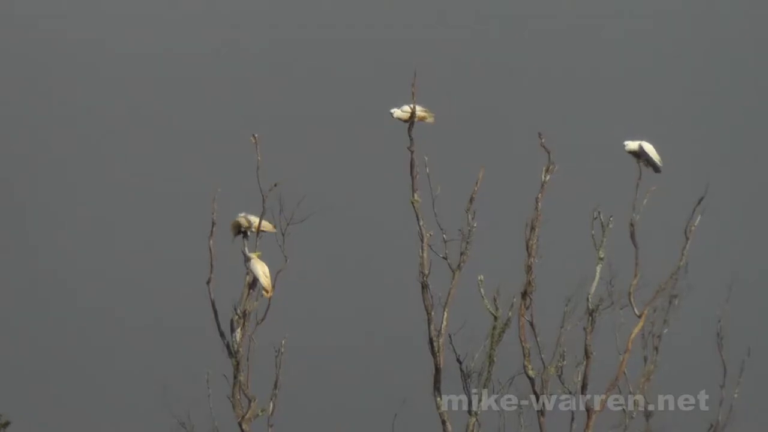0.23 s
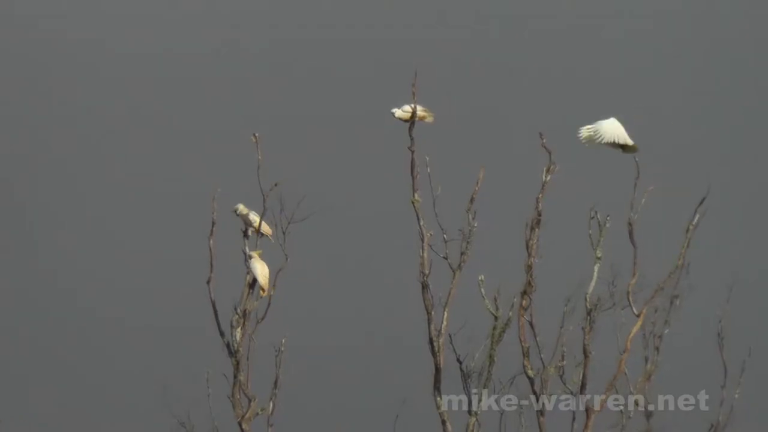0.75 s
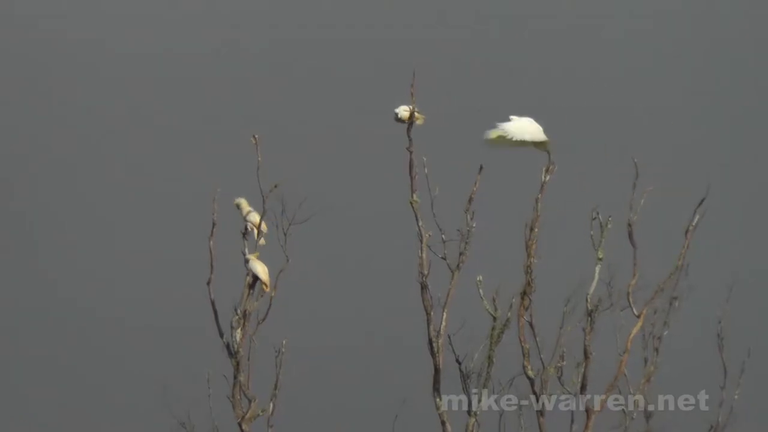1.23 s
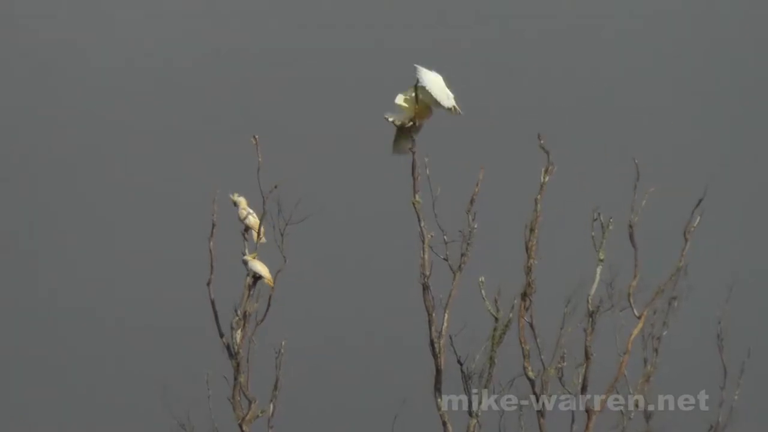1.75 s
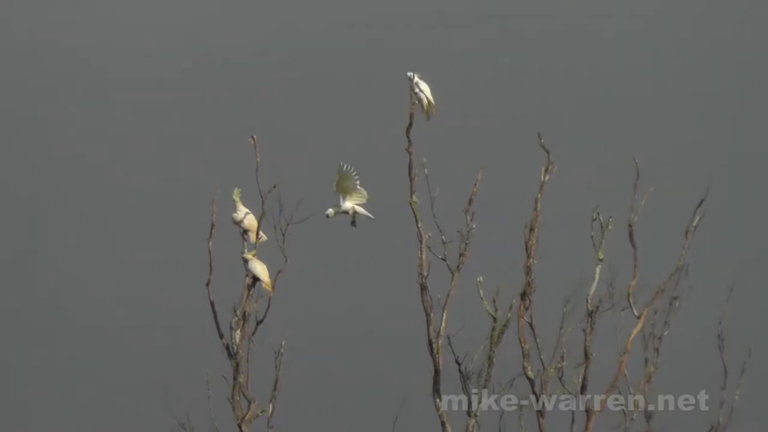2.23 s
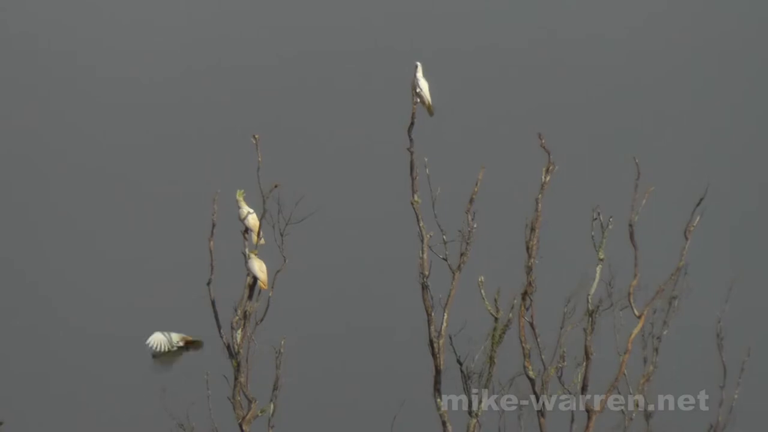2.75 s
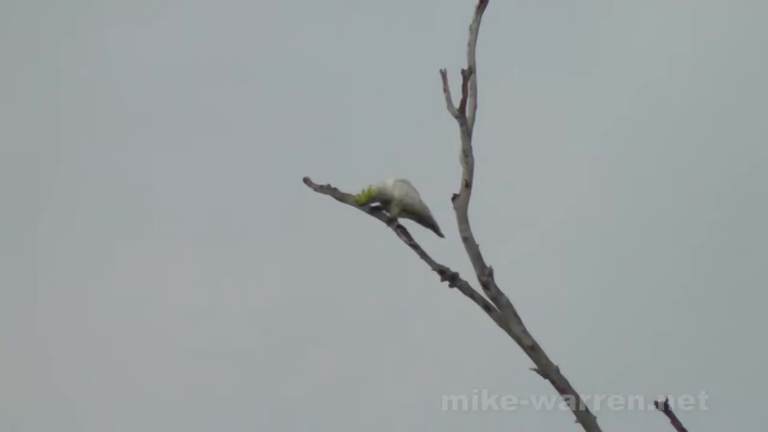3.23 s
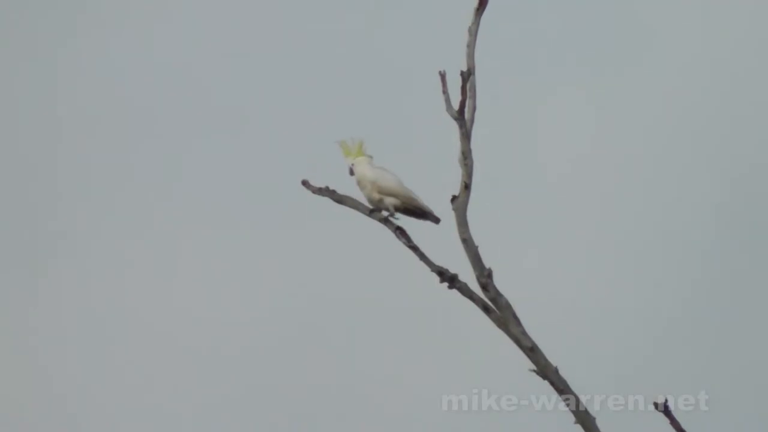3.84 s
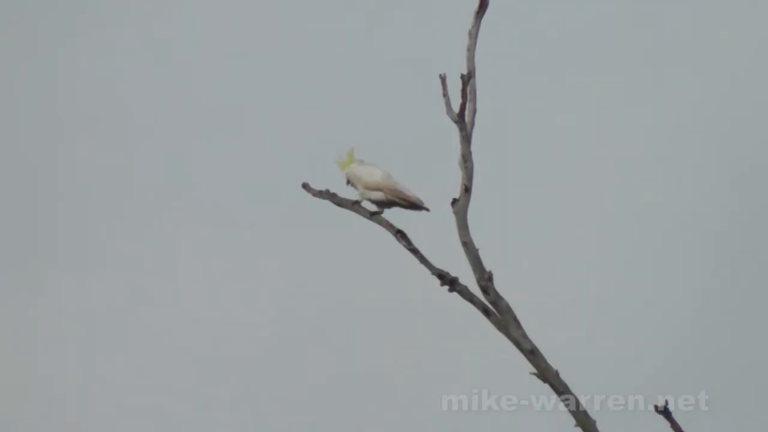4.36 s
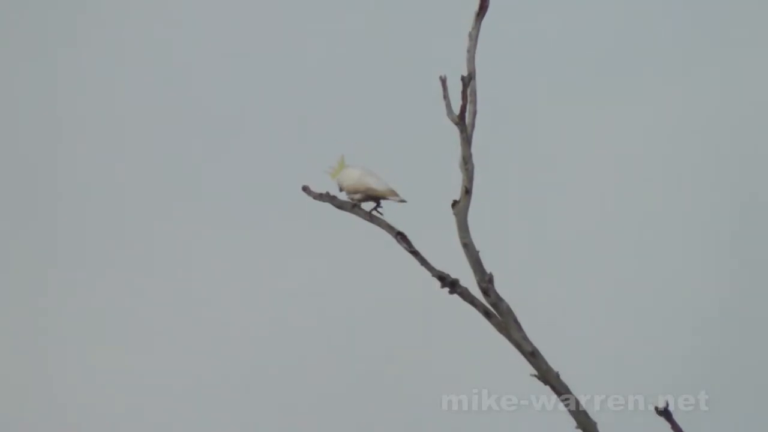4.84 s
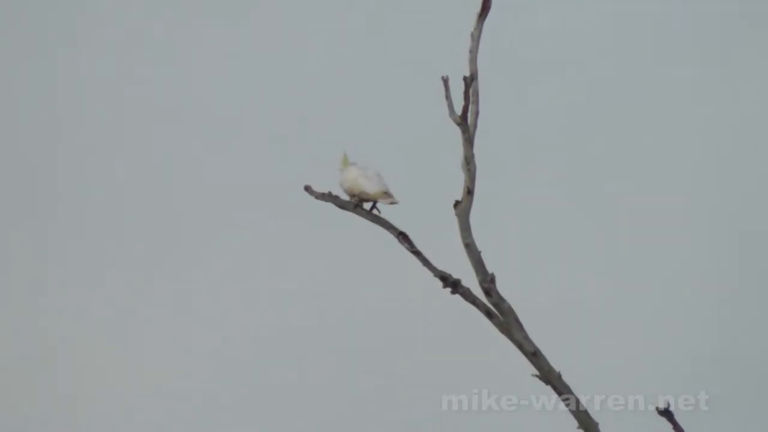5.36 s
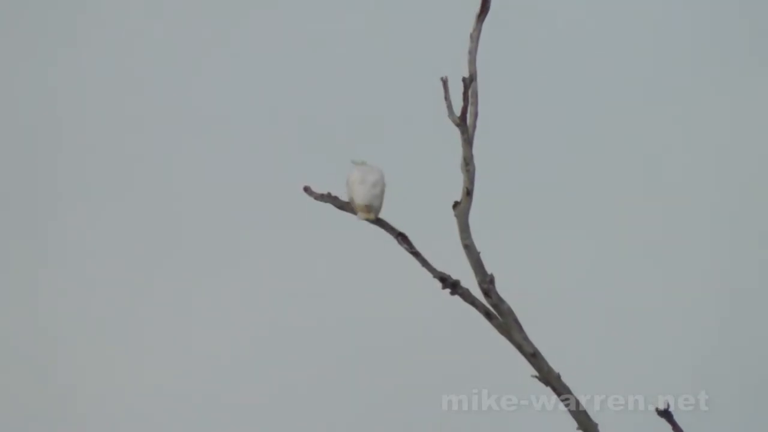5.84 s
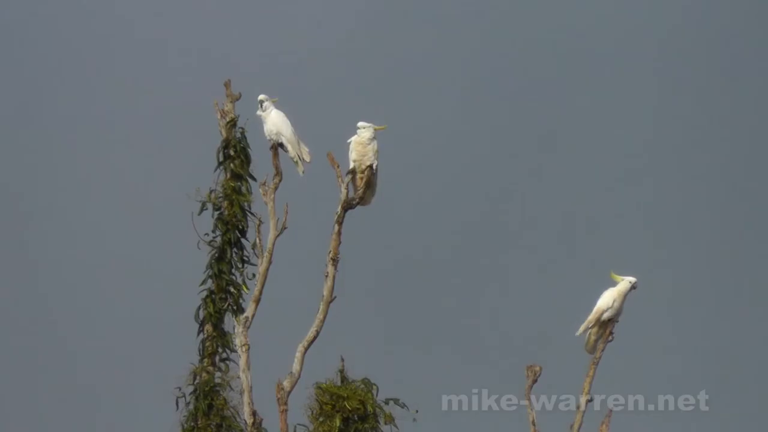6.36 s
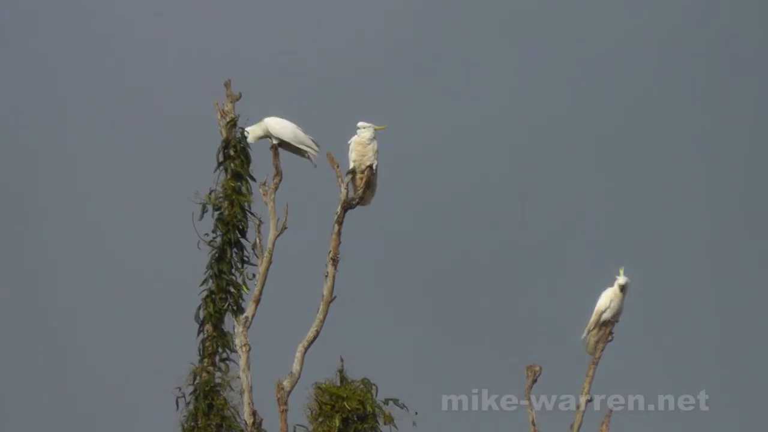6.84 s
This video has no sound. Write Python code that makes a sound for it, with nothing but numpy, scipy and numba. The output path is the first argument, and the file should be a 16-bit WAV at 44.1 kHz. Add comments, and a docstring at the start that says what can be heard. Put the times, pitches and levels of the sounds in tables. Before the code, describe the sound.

Three back-to-back raucous cockatoo screeches, then raspy croaks around a fourth, give way to popping frogs, small bird whistles and a distant noisy flock.

```python
"""Cockatoos by a river

Cockatoos screech from dead trees beside a river: four long harsh screams, and a lower rasp from a second bird.
Each voice is a syrinx source shaped by throat resonances; a scream's tone is shaken into chaos, calms and breaks.
Frogs pop as pairs of brief damped modes, crickets trill in pulsed chirps, small birds whistle and chip in glides.
Far cries are single shaking partials; the far flock, the insect haze, the wash and a soft bump are coloured noise.
The trees return a short diffuse echo of the near birds and the trills."""
import sys
import numpy as np
from scipy import signal
from scipy.fft import rfft, irfft, next_fast_len
from scipy.io import wavfile
from scipy.ndimage import uniform_filter1d
from numba import njit

SR = 44100
rng = np.random.default_rng(int(sys.argv[2]) if len(sys.argv) > 2 else 0)


def transcribe(signal):
    """Save signal, clipped to [-1, 1], as a 16-bit WAV file at the path in sys.argv[1]."""
    frames = np.atleast_2d(signal).T
    limited = np.clip(frames, -1, 1)
    pcm = np.round(limited * 32767).astype(np.int16)
    wavfile.write(sys.argv[1], SR, pcm)


N = 313110
T = np.arange(N) / SR  # time [s]

# spread of the throat and windpipe resonances, as a share of their frequency
THROAT_WANDER = 0.025

# spectral envelope of the throat: (frequency [Hz], gain [dB])
THROAT_SPECTRUM = [(60, -72), (350, -15.5), (780, -7.5), (1120, -1), (1550, 4.5), (2100, 2.5), (3100, 0),
                   (3900, -6), (4900, -9), (6600, -11), (7700, -19.5), (8400, -21.5), (10600, -33),
                   (11700, -45), (12700, -44), (15000, -65)]
# rattle of each scream in turn: (beat rate [1/s], depth [1], level of the snaps in full chaos [dB])
SCREAM_RATTLES = [(164.9, 0.53, -1), (205.7, 0.35, -8), (189, 0.24, -5), (160.2, 0.26, -16)]
# beak resonance, which shifts as the beak opens and closes: (time [s], centre [Hz], gain [dB])
BEAK_RESONANCE = [(.62, 4260, -12), (.78, 4800, 6), (.92, 4730, 0), (1.06, 4880, 2), (1.13, 4750, -15),
                  (1.25, 3430, 3), (1.65, 3430, -10), (1.85, 4820, -3.5), (2, 4900, 0), (2.05, 6640, 12),
                  (2.15, 6500, -3), (2.28, 6810, -21), (3.2, 5804, 0), (3.85, 5950, -24)]
THROAT_RATIO = 2.047  # the main throat resonance sits by the second partial
WINDPIPE_HZ, WINDPIPE_DB = 3340, -11.5  # a narrow resonance above the main one of the throat
ROUGH_PITCH_HZ = 23.8  # full chaos is this much higher than a pure tone
BREAK_DROP_HZ = 131.14  # the pitch drops by this much as a scream breaks
BREAK_THROAT_DB = -8  # the throat resonance weakens at the break
SHUDDER_DB = 1.1  # spread of the effort in full chaos


def screams(throat_db=-1.0, throat_width_hz=420.0, beak_width_hz=240.0, windpipe_width_hz=220.0):
    """Source-filter principle: a rattling syrinx excites the resonances of throat, windpipe and beak."""
    loud, treble_db, hiss_db, pitch, breaking = scream_controls()
    rough = roughness()
    surge_db, rise_hz = surges()
    beak_hz, beak_db = curves(BEAK_RESONANCE)

    pitch = pitch - ROUGH_PITCH_HZ * (1 - rough)
    throat_hz = (THROAT_RATIO * pitch + rise_hz) * (1 + THROAT_WANDER * walk(35))
    windpipe_hz = WINDPIPE_HZ * (1 + THROAT_WANDER * walk(20))

    starts = [row[0] for row in SCREAM_EVENTS]
    current = np.maximum(np.searchsorted(starts, T) - 1, 0)
    beat_hz, depth, snap_db = np.array(SCREAM_RATTLES)[current].T
    cycles = beats(beat_hz, jitter=0.15)
    flow = 1 + np.sqrt(rough) * (rattle(cycles, depth) - 1)

    source = colour(syrinx(pitch - BREAK_DROP_HZ * breaking, rough) * flow, THROAT_SPECTRUM)
    ring_db = throat_db + BREAK_THROAT_DB * breaking
    throat_ring = undb(ring_db) * resonance(source, throat_hz, throat_width_hz)
    windpipe_ring = undb(WINDPIPE_DB) * resonance(source, windpipe_hz, windpipe_width_hz)
    beak_ring = undb(beak_db) * resonance(source, beak_hz, beak_width_hz)
    voice = steady(source + throat_ring + windpipe_ring + beak_ring)
    voice = voice + undb(snap_db) * rough * (1 - breaking) * snaps(cycles, throat_hz)

    # body and treble are levelled separately, so that each follows its own control
    body = below(voice, 3300)
    hiss = voice - below(voice, 8000)
    treble = voice - body + (undb(hiss_db) - 1) * hiss
    shudder = undb(SHUDDER_DB * rough * walk(60))
    return loud * shudder * (undb(surge_db) * steady(body) + undb(treble_db) * steady(treble))


# partials of the syrinx tone: (multiple of the pitch [1], relative level [dB])
SYRINX_PARTIALS = [(1, 1), (2, 2.5), (3, -12), (4, -4.5), (5, -6.5), (7, -5.5)]


def syrinx(pitch, rough, thirds_db=2.0, air_db=6):
    """Nonlinear oscillation: chaos shakes the pitch amid rushing air; in calm it locks into a cycle of three."""
    shake = 0.115 * rough * walk(900) + 0.006 * walk(90)
    phase = 2 * np.pi * np.cumsum(pitch * (1 + shake)) / SR
    tone = unit(sum(undb(db) * np.sin(k * phase) for k, db in SYRINX_PARTIALS))
    # period tripling puts lines at every third of the pitch
    thirds = unit(sum(np.sin(k * phase / 3 + rng.uniform(0, 2 * np.pi)) for k in range(1, 8) if k % 3))
    air = noise() * (1 + 0.5 * np.cos(phase)) * (0.28 + 1.15 * rough)
    return tone + undb(thirds_db) * (1 - rough) ** 3 * thirds + undb(air_db) * air


# screams: (start [s], end [s], attack [s], opening level of the body [dB], closing level [dB],
#   treble relative to these [dB], added treble at the break [dB], gain of the hiss above 8 kHz within
#   the treble [dB], opening pitch in full chaos [Hz], pitch sag [Hz/s])
SCREAM_EVENTS = [(0.535, 1.122, 0.18, -31.5, -37, 1.5, 3, -1, 1314, 169.5),
                 (1.092, 1.664, 0.58, -26.5, -34.5, -4, 0, 0, 1288, 99),
                 (1.645, 2.295, 0.28, -32, -32, -1.5, 0.5, 3.5, 1277, 160),
                 (3.18, 3.835, 0.2, -35, -34, -0.5, 2.5, -0.5, 1135, -54.5)]
RELEASE_S = 0.06  # a scream dies away in this time
BREAK_S = 0.034  # time scale of the break at the end of a scream
ONSET_TREBLE_DB, ONSET_S = -0.5, 0.1  # a scream starts duller and brightens over this time scale


def scream_controls():
    """Slow control of a fast oscillator: loudness, treble, hiss, pitch and break pass from scream to scream."""
    loud, state = np.zeros(N), np.zeros((4, N))
    for k, row in enumerate(SCREAM_EVENTS):
        start, end, attack_s, open_db, close_db, treble_db, break_db, hiss_db, pitch_hz, sag_hz_per_s = row
        age = np.clip(T - start, 0, end - start)
        progress = age / (end - start)
        level_db = open_db + (close_db - open_db) * progress
        loud = np.hypot(loud, envelope(start, end, attack_s, RELEASE_S) * undb(level_db))
        breaking = np.exp(-((age - (end - start)) / BREAK_S) ** 2)
        bright_db = treble_db + ONSET_TREBLE_DB * np.exp(-age / ONSET_S) + break_db * breaking
        own = np.array([bright_db, np.full(N, hiss_db), pitch_hz - sag_hz_per_s * age, breaking])
        share = np.clip((T - start) / (2 * RELEASE_S), 0, 1) if k else 1
        state = state + share * (own - state)
    return loud, *state


# calm spells, when the syrinx falls out of chaos: (middle [s], half length [s], roughness left [0-1])
CALM_SPELLS = [(0.871, 0.15, 0.72), (1.437, 0.13, .42), (1.881, 0.027, 0.36), (2.061, 0.078, 0.08),
               (2.175, 0.029, 0.16), (3.483, 0.0336, .42), (3.633, 0.04, 0.44), (3.773, 0.032, 0.31)]
FULL_ROUGH = 0.9  # roughness [0-1] outside the calm spells


def roughness():
    """Transition between regimes: chaos is the rule, and in each calm spell it eases for a while."""
    rough = np.full(N, FULL_ROUGH)
    for middle, half_s, left in CALM_SPELLS:
        rough = rough + (left - rough) * np.exp(-((T - middle) / half_s) ** 4)
    return np.clip(rough, 0.02, 1)


# surges of effort inside a scream, which widen the throat:
#   (middle [s], half length [s], added level of the body [dB], rise of the throat resonance [Hz])
EFFORT_SURGES = [(0.73, 0.057, 1, 0), (1.968, 0.04, 2, 78), (2.126, 0.023, 4, 148),
                 (2.209, 0.039, 4.5, 280), (2.285, 0.036, -1.5, 450), (3.63, 0.057, 4.5, 36),
                 (3.808, 0.028, 4, 124)]


def surges():
    """Effort and tract coupled: one push changes the level and shifts the throat resonance."""
    added_db, rise_hz = 0, 0
    for middle, half_s, db, hz in EFFORT_SURGES:
        push = np.exp(-((T - middle) / half_s) ** 2)
        added_db = added_db + db * push
        rise_hz = rise_hz + hz * push
    return added_db, rise_hz


def beats(rate_hz, jitter):
    """Integrated frequency: the running count of the membranes' uneven beats."""
    return np.cumsum(rate_hz * (1 + jitter * walk(np.mean(rate_hz)))) / SR


def rattle(cycles, depth):
    """Amplitude modulation: each beat lets through a puff of air."""
    return steady(np.exp(depth * np.cos(2 * np.pi * cycles)))


def snaps(cycles, throat_hz, width_hz=800.0, upper_hz=4900.0, upper_width_hz=1100.0, upper_db=-3, scatter_db=0.5):
    """Impulse excitation: the membranes snap shut at each beat and ring two resonances of the throat."""
    pulses = -np.diff(np.floor(cycles), prepend=0) * undb(scatter_db * walk(200))
    lower = resonance(pulses, throat_hz, width_hz)
    upper = resonance(pulses, np.full(N, upper_hz), upper_width_hz)
    ring = lower + undb(upper_db) * upper
    return steady(colour(ring, [(700, -9), (2200, 20), (5300, 0.0), (6500, -21), (12000, -43)]))


# rasps: (start [s], end [s], level [dB], opening buzz rate [Hz], closing buzz rate [Hz])
RASP_EVENTS = [(2.971, 3.071, -38, 284.3, 276.2), (3.09, 3.218, -32, 309.3, 275.3),
               (3.233, 3.355, -32.5, 272, 315.7), (3.868, 3.959, -33.5, 278.7, 291),
               (3.97, 4.063, -34.5, 286.3, 297)]
# spectral envelope of the second bird's throat: (frequency [Hz], gain [dB])
RASP_SPECTRUM = [(60, -92), (600, -24), (1050, -7.5), (1700, -18), (1920, -4.5), (2200, -11), (2500, -8),
                 (3300, -11), (6000, -30), (12000, -75)]
RASP_ATTACK_S, RASP_RELEASE_S = 0.048, 0.047
RASP_THROAT_RATIO = 7.22  # throat resonance as a multiple of the buzz rate


def rasps(air_db=10.0, ring_db=4, ring_width_hz=260.0):
    """Source-filter principle: a gliding, uneven buzz in rushing air rings a narrow throat that follows it."""
    rate_points = []
    for start, end, _, open_hz, close_hz in RASP_EVENTS:
        rate_points += [(start, open_hz), (end, close_hz)]
    rate_hz, = curves(rate_points)
    cycles = beats(rate_hz, jitter=0.045)
    buzz = unit(sum(np.sin(2 * np.pi * (k * cycles + rng.uniform())) for k in range(7, 10)))
    source = colour((buzz + undb(air_db) * noise()) * rattle(cycles, depth=0.27), RASP_SPECTRUM)
    ring_hz = RASP_THROAT_RATIO * rate_hz * (1 + THROAT_WANDER * walk(35))
    voice = steady(source + undb(ring_db) * resonance(source, ring_hz, ring_width_hz))
    loud = sum(undb(db) * envelope(start, end, RASP_ATTACK_S, RASP_RELEASE_S)
               for start, end, db, _, _ in RASP_EVENTS)
    return voice * loud


# pops of the nearest frogs, to which near_db is added:
#   (time [s], relative peak of the low mode [dB], relative peak of the high mode [dB])
NEAR_POPS = [(0.032, -34, -31), (0.124, -39, -27), (.296, -38, -30), (0.314, -31.5, -25), (.328, -35, -32),
             (0.341, -35.5, -25), (0.563, -35.5, -32), (0.844, -27, -42), (0.906, -29, -18.5),
             (1.98, -32, -27), (2.003, -31, -22), (2.381, -34.5, -28.5), (2.489, -39, -32),
             (2.552, -36, -41.5), (2.684, -36, -30.5), (2.729, -42, -29.5), (2.839, -39, -29.5),
             (2.872, -28.5, -31), (3.819, -33, -20), (4.031, -41, -32), (4.179, -29.5, -30),
             (4.277, -30.5, -19.5), (4.311, -38, -28.5), (4.548, -37, -25.5), (4.587, -33.5, -26),
             (4.808, -37, -30.5), (4.842, -35.5, -31), (4.939, -42, -29), (5.1, -42, -34),
             (5.151, -29, -20.5), (5.226, -30, -30), (5.297, -40, -32), (5.593, -54, -27),
             (5.651, -49, -35), (5.676, -39, -32), (5.765, -46, -41), (5.829, -34.5, -31),
             (5.964, -36, -31), (5.98, -36.5, -29), (6.07, -37, -41), (6.128, -42, -32), (6.177, -36, -31),
             (6.187, -42, -32), (6.2, -42, -26), (6.213, -29.5, -36), (6.434, -36, -30), (6.468, -45, -28),
             (6.5, -36, -31), (6.536, -33.5, -34), (6.555, -34, -28), (6.623, -44, -44),
             (6.759, -29.5, -28), (6.787, -40, -31), (6.85, -48, -37), (6.979, -39, -28), (7.048, -38, -38),
             (7.086, -30, -23.5)]
LEAD_S = 0.008  # the centre of a pop lies this long after its first sample


def frogs(near_db=3.0, far_low_db=-43, far_high_db=-36.0, spread_db=4,
          bank_low_db=-40, bank_high_db=-34, bank_spread_db=3, count=330):
    """Superposed transients: near frogs pop singly, those along the bank at random, further ones patter."""
    out = np.zeros(N)
    last_s = N / SR - 2 * LEAD_S
    for s, low_db, high_db in NEAR_POPS:
        add(out, s - LEAD_S, pop(low_db + near_db, high_db + near_db))
    for s, (near, bright) in zip(rng.uniform(0, last_s, count), rng.uniform(-1.97, 1, (count, 2))):
        low_db = far_low_db + spread_db * (near - bright)
        high_db = far_high_db + spread_db * (near + bright)
        add(out, s, pop(low_db, high_db))
    for when, tone in rng.uniform(0, 1, size=(45, 2)):
        bright_db = bank_spread_db * (2 * tone - 1)
        add(out, when * last_s, pop(bank_low_db - bright_db, bank_high_db + bright_db))
    return out


def pop(low_db, high_db, low_hz=700, high_hz=1560, low_s=0.0013, high_s=0.00057, lag_s=0.00092):
    """Two-mode transient: the low mode of the vocal sac swells first, the high mode snaps just after."""
    t = np.arange(SR // 50) / SR - LEAD_S
    size = 1 + 0.035 * rng.standard_normal()  # scales both mode frequencies
    turn = rng.uniform(0, 2 * np.pi)
    low = np.exp(-0.5 * ((t + lag_s) / low_s) ** 2) * np.sin(2 * np.pi * low_hz * size * t + turn)
    high = np.exp(-0.5 * ((t - lag_s) / high_s) ** 2) * np.sin(2 * np.pi * high_hz * size * t + turn)
    return undb(low_db) * low + undb(high_db) * high


# cricket trills: (start [s], end [s], top pitch [Hz], pulse rate [Hz],
#   fall of pitch half a stroke away from the top [share of the pitch], typical level [dB])
CRICKET_TRILLS = [(.3, 7.4, 4870, 34.9, 0.1, -50), (2.3, 6.1, 9600, 34.3, 0.1, -84),
                  (0, 7.2, 4650, 41.6, 0, -57), (0, 0.47, 4900, 52.5, 0.1, -50.5),
                  (0, 0.32, 6420, 48.4, 0.04, -53.5), (4.84, 5.2, 6110, 47.5, .08, -52),
                  (5.06, 6.9, 6460, 46.8, 0.17, -54), (5.2, 5.4, 5380, 46.3, 0, -52.5)]
STROKE_TOP = 0.67  # share of a wing stroke at which its pitch peaks


def crickets():
    """Pulsed carrier with a frequency sweep: each wing stroke chirps up to a top pitch and curls over."""
    out = 0
    for start, end, hz, rate, arch, db in CRICKET_TRILLS:
        place = np.cumsum(rate * (1 + 0.05 * walk(25))) / SR % 1  # position within the stroke [0-1]
        stroke = np.sin(np.pi * place) ** 2
        sweep = 1 - arch * (2 * (place - STROKE_TOP)) ** 2
        phase = 2 * np.pi * np.cumsum(hz * sweep + 55 * walk(700)) / SR
        loud = undb(db + 2 * walk(25)) * gate(start, end)
        out = out + loud * unit(stroke * np.sin(phase))
    return out


# clear notes of a songbird, linked into slurs:
#   (time [s], length [s], start pitch [Hz], end pitch [Hz], gain [dB])
SONG_NOTES = [(5.09, 0.079, 2400, 2900, -53), (5.56, 0.052, 2460, 2510, -46),
              (5.66, 0.049, 2507, 2425, -53.5), (6.04, 0.072, 2440, 2557, -47),
              (6.095, 0.094, 2910, 2540, -50), (6.145, 0.075, 2500, 2466, -45),
              (6.21, 0.071, 2520, 2640, -49), (6.925, 0.086, 2760, 2800, -43),
              (6.99, 0.063, 2770, 2860, -44)]
# thin chips of small birds: (time [s], length [s], start pitch [Hz], end pitch [Hz], gain [dB])
CHIP_NOTES = [(4.25, 0.075, 5050, 5200, -50), (4.57, 0.0895, 3900, 3600, -54),
              (4.61, 0.16, 7800, 7600, -63), (4.8, .08, 4050, 4090, -53), (5.72, 0.073, 5550, 5700, -59),
              (5.16, 0.15, 10700, 10350, -73), (6.05, .14, 10000, 9650, -66.5),
              (6.1, 0.104, 8550, 8300, -60), (6.25, 0.13, 8700, 8000, -61.5), (6.555, .05, 4950, 5060, -57),
              (6.86, 0.019, 6250, 5730, -49)]


def small_birds(notes, waver):
    """Frequency modulation: thin sine glides that waver slightly under a rounded envelope."""
    out, wobble = np.zeros(N), 1 + waver * walk(400)
    for s, length, start_hz, end_hz, db in notes:
        n = int(length * SR)
        hz = np.linspace(start_hz, end_hz, n) * np.roll(wobble, -int(s * SR))[:n]
        swell = np.sqrt(2 * np.hanning(n))
        add(out, s, undb(db) * swell * np.sin(2 * np.pi * np.cumsum(hz) / SR))
    return out


# harsh cries of far birds: (start [s], end [s], opening pitch [Hz], closing pitch [Hz], level [dB])
DISTANT_CRIES = [(4.49, 4.682, 5600, 5260, -46), (5.41, 5.687, 1980, 1918, -47),
                 (5.734, 5.871, 1860, 1792, -42.5), (6.233, 6.32, 2550, 2527, -44),
                 (6.289, 6.326, 1930, 1950, -40), (6.551, 6.699, 2624, 2495, -42.5)]
FAR_CRY_ATTACK_S, FAR_CRY_RELEASE_S = 0.029, 0.027


def far_cries(shake_hz=250):
    """Loss with distance: only the strongest, shaking partial of a cry carries."""
    out = 0
    for start, end, open_hz, close_hz, db in DISTANT_CRIES:
        hz = np.interp(T, (start, end), (open_hz, close_hz)) + shake_hz * walk(700)
        partial = unit(np.sin(2 * np.pi * np.cumsum(hz) / SR))
        out = out + undb(db) * envelope(start, end, FAR_CRY_ATTACK_S, FAR_CRY_RELEASE_S) * partial
    return out


# swell of the far flock: (time [s], level [dB])
FLOCK_LEVEL = [(0, -44.5), (2.2, -46.5), (3.2, -45), (4.3, -60), (5.4, -45), (5.9, -46), (6.55, -37.5),
               (7.1, -38.5)]
# spectrum of the far flock: (frequency [Hz], gain [dB])
FLOCK_SPECTRUM = [(60, -69), (350, -12.5), (700, 1.5), (1100, 3), (2000, 1), (2700, 4), (3200, -1),
                  (4300, -3.5), (6000, -18), (8500, -23.5), (11000, -78)]


def flock():
    """Incoherent summation: far screams blur into noise with four restless tones, each flickering alone."""
    cries = 0
    for hz in (1700, 2100, 2600, 4400):
        restless_hz = hz * (1 + 0.06 * walk(6) + 0.11 * walk(800))
        cries = cries + undb(2 * walk(14)) * np.sin(2 * np.pi * np.cumsum(restless_hz) / SR)
    roar = unit(colour(noise() + undb(-10.5) * unit(cries), FLOCK_SPECTRUM))
    return roar * undb(curves(FLOCK_LEVEL)[0])


def bump(s=4.29, width_s=0.058, db=-62):
    """Band-limited noise burst: a soft low bump under a bell-shaped envelope."""
    low = unit(colour(noise(), [(50, -36), (110, -5.0), (170, -1.0), (350, -35), (1000, -67)]))
    return low * undb(db) * np.exp(-0.5 * ((T - s) / width_s) ** 2)


# spectrum of river and distance: (frequency [Hz], gain [dB])
WASH_SPECTRUM = [(40, -52), (70, -33), (100, -23.5), (200, -12), (400, -8.5), (520, -6), (680, -2.5),
                 (900, -3.5), (1500, -4.5), (2100, -0.5), (2700, -6.5), (3400, -12), (5000, -42.5)]
# spectrum of the massed insects: (frequency [Hz], gain [dB])
INSECT_SPECTRUM = [(2500, -64), (3400, -3), (4100, 3.5), (4500, 8), (5000, 2.5), (5600, 3.5), (6250, 1),
                   (6900, -12), (7800, -20), (9400, -13.5), (10000, -57), (13000, -55), (14200, -33),
                   (15500, -52)]
WASH_DB, INSECTS_DB = -45.5, -45.5


def background():
    """Many sources merge into noise: the wash of river and distance under a haze of insects."""
    wash = unit(colour(noise(), WASH_SPECTRUM)) * undb(WASH_DB + 0.054 * walk(0.6))
    insects = unit(colour(noise(), INSECT_SPECTRUM)) * undb(INSECTS_DB + 0.93 * walk(13))
    return wash + insects


def trees(x, t60, gap_s):
    """Diffuse scattering: trunks and the far bank return a short, exponentially decaying tail."""
    t = np.arange(SR) / SR
    tail = rng.standard_normal(SR) * undb(-60 * t / t60) * (1 - np.exp(-t / gap_s))
    return signal.fftconvolve(x, tail / np.sqrt(np.sum(tail ** 2)))[:N]


@njit
def resonance(x, hz, width):
    """Damped resonator: a state-variable band-pass whose centre moves."""
    y, band, low = np.empty(len(x)), 0., 0.
    for i in range(len(x)):
        g, k = np.tan(np.pi * hz[i] / SR), width / hz[i]
        v = (band + g * (x[i] - low)) / (1 + g * (g + k))
        band, low, y[i] = 2 * v - band, low + 2 * g * v, k * v
    return y


def colour(x, points):
    """Linear filtering: multiply the spectrum by a curve through (frequency [Hz], gain [dB]) points."""
    hz, db = np.transpose(points)
    size = next_fast_len(N)
    f = np.maximum(np.arange(size // 2 + 1) * SR / size, 1)
    gain = undb(np.interp(np.log(f), np.log(hz), db))
    return irfft(rfft(x, size) * gain, size)[:N]


def below(x, hz):
    """Zero-phase filtering: a low-pass without delay."""
    return signal.sosfiltfilt(signal.butter(4, hz, fs=SR, output="sos"), x)


def envelope(start, end, attack_s, release_s):
    """Amplitude envelope: swell from the start, hold until the end, then die away."""
    rise = np.clip((T - start) / attack_s, 0, 1)
    fall = np.clip(1 - (T - end) / release_s, 0, 1)
    return np.sin(np.pi / 2 * rise) * fall


def gate(start, end):
    """Time window: one between two times, with 20 ms edges."""
    return np.clip((T - start) / 0.02 + 0.5, 0, 1) * np.clip((end - T) / 0.02 + 0.5, 0, 1)


def curves(rows):
    """Linear interpolation: the columns of a table, joined by straight lines in time."""
    s, *columns = np.transpose(rows)
    return [np.interp(T, s, c) for c in columns]


def noise():
    """White noise: equal power at all frequencies."""
    return rng.standard_normal(N)


def walk(rate):
    """Slow random modulation: levels drawn at a rate per second, joined by straight lines; rms 1."""
    levels = rng.standard_normal(N // 16)
    return unit(np.interp(T * rate, np.arange(len(levels)), levels))


def undb(db):
    """Logarithmic level: decibels to amplitude gain."""
    return 10 ** (np.asarray(db) / 20)


def unit(x):
    """Power normalisation: scale to rms 1."""
    return x / np.sqrt(np.mean(x ** 2))


def steady(x):
    """Short-time normalisation: scale to rms 1 over every 50 ms, keeping the fast grain."""
    return x / np.sqrt(np.abs(uniform_filter1d(x ** 2, size=2205)) + 1e-12)


def add(out, s, x):
    """Superposition: mix a short sound in at a time in seconds."""
    i = int(np.clip(s * SR, 0, N - 1))
    out[i:i + len(x)] += x[:N - i]


# level of the trees' echo of each source, relative to its direct sound [dB]
SCREAM_ECHO_DB, RASP_ECHO_DB, WHISTLE_ECHO_DB, CHIP_ECHO_DB, TRILL_ECHO_DB = -3, -8.5, -2.5, 4.5, -11


def scene():
    """Direct sound plus scattered sound: cockatoos in front, the riverside life around them."""
    screaming, rasping, trills = screams(), rasps(), crickets()
    whistles = small_birds(SONG_NOTES, waver=0.0044)
    chips = small_birds(CHIP_NOTES, waver=0.0118)
    scattered = (undb(SCREAM_ECHO_DB) * screaming + undb(RASP_ECHO_DB) * rasping
                 + undb(WHISTLE_ECHO_DB) * whistles + undb(CHIP_ECHO_DB) * chips
                 + undb(TRILL_ECHO_DB) * trills)
    echo = trees(scattered, t60=0.72, gap_s=0.00037)
    near = screaming + rasping + whistles + chips + trills + echo + frogs()
    far = flock() + far_cries() + background() + bump()
    return (near + far)[None]


TOP_HZ = 15700  # upper edge of the pass band


def record(dry):
    """Band limiting: a steep elliptic low-pass cuts the top."""
    return signal.sosfilt(signal.ellip(12, 0.2, 70, TOP_HZ, fs=SR, output="sos"), dry)


dry = scene()
out = record(dry)
transcribe(out)
```